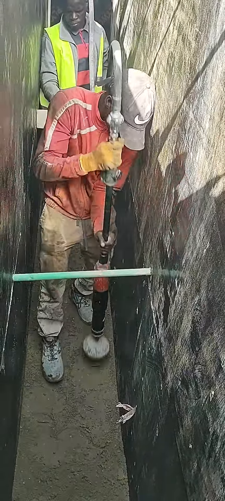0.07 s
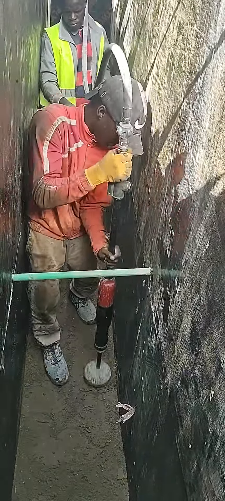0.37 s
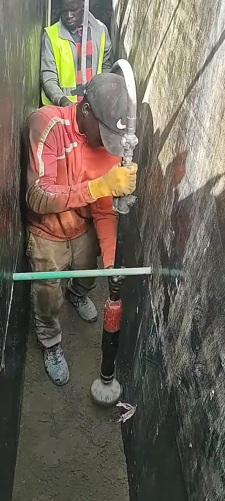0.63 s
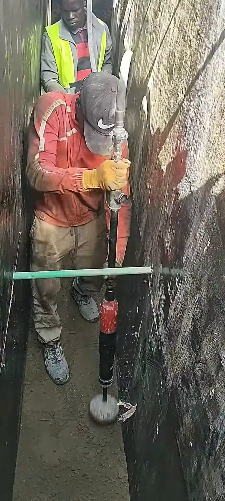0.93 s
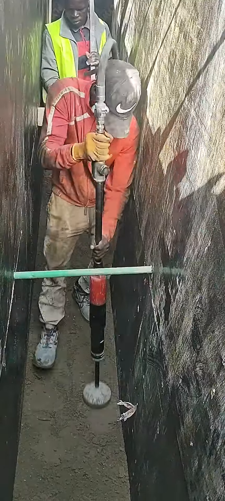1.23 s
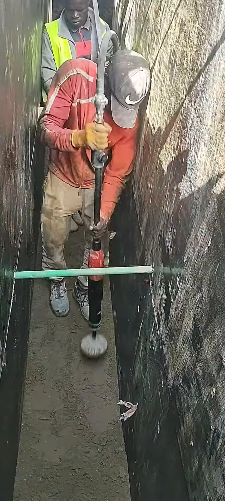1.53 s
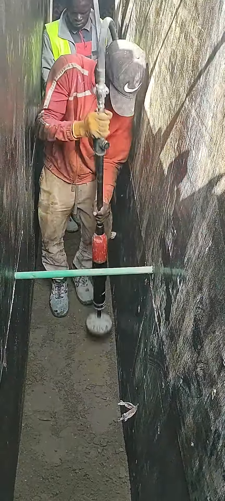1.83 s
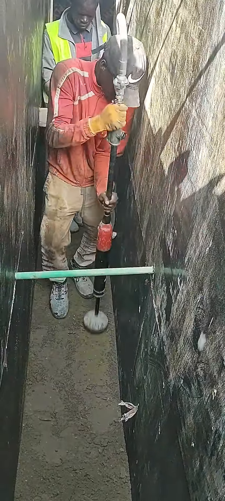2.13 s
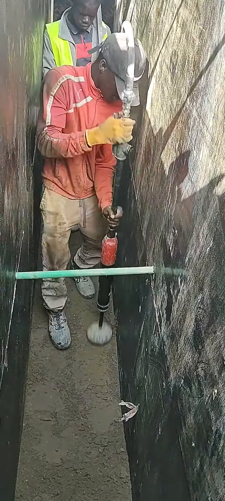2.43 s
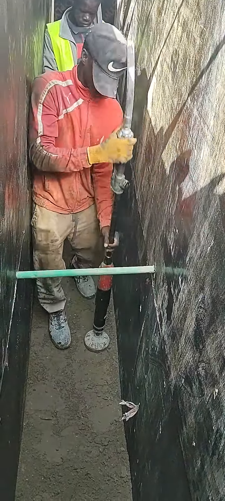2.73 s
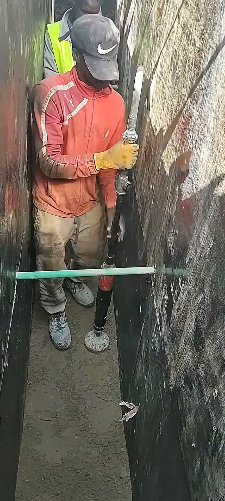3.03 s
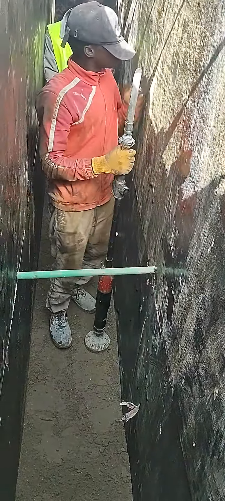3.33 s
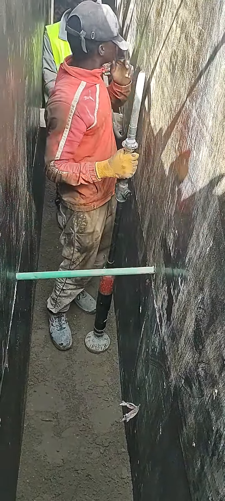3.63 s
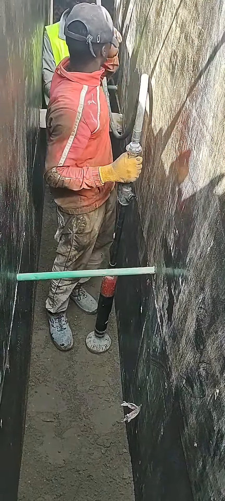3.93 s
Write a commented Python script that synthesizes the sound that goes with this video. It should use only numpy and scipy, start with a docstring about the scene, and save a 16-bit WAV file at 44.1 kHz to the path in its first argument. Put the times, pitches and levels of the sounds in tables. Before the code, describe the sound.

A pneumatic rammer pounds earth close by from the start, about nine even strokes a second, with low thuds and sharp hissing air bursts ringing between tall panels. At about 2.6 seconds it sputters and bounces to rest, with a low boom from the panels fading just after 3 seconds. One tiny puff follows near 3.3 seconds, and a faint, distant compressor hums on until the end.

```python
"""A pneumatic rammer pounds earth between the tall panels of a wall form, close to a stereo microphone.
Nine times a second it vents twice, each time a pressure pulse and a jet of hiss that ring between
the panels, and in between the foot thuds down. The air is shut off, the tool sputters and settles,
and far off across the building site a compressor hums on."""
import sys
import numpy as np
from scipy import signal
from scipy.fft import rfft, irfft
from scipy.io import wavfile
from scipy.ndimage import map_coordinates

SR = 44100
rng = np.random.default_rng(int(sys.argv[2]) if len(sys.argv) > 2 else 0)


def output_pcm(signal):
    """Save a mono or channel-first signal as 16-bit PCM at the path in sys.argv[1].

    Samples are clipped to [-1, 1] before scaling.
    """
    pcm = np.clip(np.atleast_2d(signal).T, -1, 1) * 32767
    wavfile.write(sys.argv[1], SR, np.round(pcm).astype(np.int16))


N = 176400
TIME = np.arange(N) / SR


def from_db(db):
    """Decibels to gain."""
    return 10 ** (np.asarray(db) / 20)


def rms_one(x):
    """Scale to unit rms."""
    return x / np.sqrt(np.mean(x ** 2) + 1e-20)


def at_hz(points, hz):
    """Read a curve on a log-frequency axis."""
    f, value = np.transpose(points)
    return np.interp(np.log(hz + 1), np.log(f), value)


def drift(rate):
    """Smooth random motion of rms 1 that changes about rate times a second."""
    count = int(rate * N / SR) + 4
    return rms_one(signal.resample(rng.standard_normal(8192)[:count], N))


def low_cut(x, hz, order=2):
    """Butterworth high-pass."""
    return signal.sosfilt(signal.butter(order, hz, "high", fs=SR, output="sos"), x + 1e-18)


def resonance(x, hz, width):
    """Band-pass of gain 1 at its peak."""
    return signal.lfilter(*signal.iirpeak(hz, hz / width, fs=SR), x)


def pan(db):
    """Channel gains with the left louder by db."""
    return from_db([[db / 2], [-db / 2]])


def pushes(events, length_s):
    """A smooth bump for each (start, dB); the level sets its area."""
    out = np.zeros(N)
    for s, db in events:
        span = slice(int(s * SR), int((s + length_s) * SR) + 2)
        bump = np.sin(np.pi * np.clip((TIME[span] - s) / length_s, 0, 1)) ** 2
        out[span] += from_db(db) * bump / bump.sum()
    return out


def ring(x, hz, t60):
    """One mode: a unit click starts a wave of height 1 that falls 60 dB in t60 seconds."""
    r, w = 1000 ** (-1 / (t60 * SR)), 2 * np.pi * hz / SR
    return signal.lfilter([1 / 2, 0, -1 / 2], [1, -2 * r * np.cos(w), r * r], x + 1e-18)


def running(end_s, fade_db_per_s):
    """Gain that holds until end_s, then dies away."""
    return from_db(-fade_db_per_s * np.maximum(TIME - end_s, 0))


# How alike the microphone's two sides are. Each row: frequency in Hz, correlation.
STEREO_LIKENESS = [(60, .92), (150, 0.94), (300, 0.74), (600, 0.26), (1200, .25), (2500, .03)]
def noise(spectrum, likeness=STEREO_LIKENESS):
    """Coloured stereo noise of rms 1, by default wider toward the treble."""
    hz = np.arange(N // 2 + 1) * SR / N
    mid, side = rfft(rng.standard_normal((2, N)))
    alike = at_hz(likeness, hz)
    stereo = np.sqrt(1 + alike) * mid + np.sqrt(1 - alike) * side * [[1], [-1]]
    return rms_one(irfft(from_db(at_hz(spectrum, hz)) * stereo, N))


# The site in the distance. Each row: frequency in Hz, relative density in dB.
SITE_SPECTRUM = [(25, -33), (45, -19.5), (70, -5), (95, 1.5), (120, -2.5), (170, -3.5), (250, -19.5),
                 (300, -15), (400, -11), (560, -15), (750, -24), (1150, -29), (1550, -24.5), (2400, -31),
                 (3500, -43.5), (5000, -54.5), (9000, -60.5), (15000, -65.5)]
def site():
    """Steady low noise from far across the site."""
    return from_db(-39.5) * noise(SITE_SPECTRUM)


# The compressor, far from the microphone. Each row: harmonic number, level in dB.
HUM_HARMONICS = [(1, -47.5), (2, -51), (3, -41.5), (4, -47.5), (7, -45), (8, -46), (9, -51), (10, -54),
                 (11, -60), (14, -61)]
def compressor(beat_hz=49.55, waver_db=2):
    """An engine throbs steadily; its higher partials arrive a little later in each beat."""
    angle = 2 * np.pi * np.cumsum(beat_hz * (1 + .004 * drift(8))) / SR
    hum = 0
    for k, db in HUM_HARMONICS:
        height = np.sqrt(2) * from_db(db + waver_db * drift(6.2))
        stereo_phase = np.array([[0], [rng.normal(0, .3)]])
        hum += height * np.cos(k * angle - .2505 * k * k + stereo_phase)
    return hum


# Rumble and boom of the nearby panels. Each row: frequency in Hz, relative density in dB.
RUMBLE_SPECTRUM = [(30, -28), (60, -8.5), (110, 1.5), (200, -4.5), (400, -1.5), (700, -13.5), (1500, -27.5),
                   (3000, -44.5), (8000, -80)]
BOOM_SPECTRUM = [(40, -17.5), (75, -5.5), (100, 1), (155, -1.5), (230, -11), (400, -16), (800, -33.5),
                 (2000, -54), (6000, -90)]
# The swell of the boom. Each row: time in seconds, level in dB.
BOOM_SWELL = [(2.5, -43), (2.67, -24.5), (2.89, -20.5), (2.97, -28.5), (3.12, -38), (3.35, -65)]
def panels():
    """The shaken panels rumble while the tool runs and boom as it comes to rest."""
    rumble = from_db(-24) * noise(RUMBLE_SPECTRUM) * running(end_s=2.74, fade_db_per_s=87)
    boom = from_db(np.interp(TIME, *np.transpose(BOOM_SWELL))) * noise(BOOM_SPECTRUM)
    return rumble + boom


# The rammer's strokes, for foot and exhaust alike. Each row: start in seconds, then relative
# levels in dB of the pulse, the first hiss and the second hiss.
STROKES = [(0.0202, -1.3, 0.4, 0), (0.1316, -0.2, 1.1, 2), (0.2417, 0.8, 0.3, 1.1), (0.3524, 1, 0.5, 1.5),
           (0.46, -0.5, 0.4, -0.2), (0.5722, -1.4, 0.5, 1.6), (0.6818, 0.4, 1.3, 0.7),
           (0.791, -1.3, -0.2, -0.8), (0.9005, -0.8, -0.4, 0.5), (1.0105, 0.5, 0.5, 0.6),
           (1.121, -0.6, 0, 0.3), (1.2317, -0.5, 0.9, 0.1), (1.3434, 0, 0.2, -0.1),
           (1.4542, -1.8, 0.5, 0.2), (1.565, 0, 0.2, 1.9), (1.6762, -1.8, -1, -0.9),
           (1.7881, -1, -0.6, 1.4), (1.8998, 0.5, 0.4, 0.9), (2.0095, 0.4, 0, 1.8), (2.1203, 1, 1.5, 3.1),
           (2.229, 1, 0.3, 1.2), (2.3384, 1.5, -0.5, 1), (2.4478, 1.8, 1, 1.2), (2.5594, -0.3, 0.2, -2.5)]
# The foot bounces to rest. Each row: start in seconds, relative level in dB.
BOUNCES = [(2.653, -1), (2.707, -0.5), (2.765, -3), (2.803, -3), (2.848, -2.5), (2.879, 0), (2.961, -15),
           (3.021, -17)]
# Ground and panels under the foot. Each row: frequency in Hz, level in dB, t60 in seconds.
GROUND_MODES = [(62.3, -35, 0.26), (92.2, -20.5, 0.35), (118.8, -19, 0.35), (145.3, -31.5, 0.095),
                (203, -34, 0.16), (333, -33.5, 0.078)]
def foot(landing_s=.0245):
    """The foot lands softly on the earth once a stroke and sets low modes ringing."""
    landings = [(s + landing_s, 0) for s, *_ in STROKES]
    push = pushes(landings + BOUNCES, length_s=.0028)
    thuds = sum(from_db(db) * ring(push, hz, t60) for hz, db, t60 in GROUND_MODES)
    return low_cut(thuds, hz=50.3)


def puff(start_s, db, attack_s, hold_s, fade_db_per_s):
    """Power envelope of one puff of air."""
    power, span = np.zeros(N), slice(int(start_s * SR), int((start_s + .5) * SR))
    age = TIME[span] - start_s
    fade_db = fade_db_per_s * np.maximum(age - attack_s - hold_s, 0)
    power[span] = (np.clip(age / attack_s, 0, 1) * from_db(db - fade_db)) ** 2
    return power


def jet_noise(spectrum, peaks):
    """Wide hiss with resonances lifted out of it."""
    air = low_cut(noise(spectrum, likeness=[(1000, .043)]), hz=1240)
    return air + sum(from_db(db) * resonance(air, hz, width) for hz, width, db in peaks)


# The last puffs. Each row: start in seconds, pulse level in dB, hiss level in dB,
# hold in seconds, fade in dB per second.
SPUTTERS = [(2.6883, -15, -17.5, 0.0046, 518), (2.764, -2, -21.5, 0.0026, 502),
            (2.876, -26, -41, 0.0044, 650), (2.927, -30, -47.5, 0.015, 400),
            (2.976, -48, -65.5, 0.057, 200), (3.289, -33, -73, 0.0085, 348)]
# Their thin hiss. Each row: frequency in Hz, relative density in dB.
SPUTTER_SPECTRUM = [(880, -32), (1500, 1), (1640, -4.5), (3360, -2.5), (5040, -7.5), (6510, -1.5),
                    (9100, -3), (10200, -4), (15800, -1.5)]
# Whistles of the port. Each row: frequency in Hz, width in Hz, gain in dB.
PORT_WHISTLES = [(6780, 500, -5), (10400, 445, -4)]
def sputter_hiss(attack_s=.003):
    """With the air shut off, weak puffs whistle through the half-closed port."""
    power = sum(puff(s, db, attack_s, hold, fade) for s, _, db, hold, fade in SPUTTERS)
    return rms_one(jet_noise(SPUTTER_SPECTRUM, PORT_WHISTLES)) * np.sqrt(power)


# The full jet, heard close. Each row: frequency in Hz, relative density in dB.
JET_SPECTRUM = [(530, -30), (900, 3.5), (1050, -6.5), (1160, -4.5), (1270, -3), (1450, -5.5), (1580, -5),
                (2010, -5.5), (2520, -8), (3290, -0.5), (4650, 0), (5770, -1), (7160, -7.5), (9660, -6),
                (11300, -7.5), (15100, -6), (15800, -8)]
# Resonances that it excites. Each row: frequency in Hz, width in Hz, gain in dB.
JET_RESONANCES = [(1134, 45, 3), (1471, 39, 2), (1930, 70, -13.5), (5200, 46, -11)]
# Its reflections off the panels beside the tool. Each row: delay in seconds, gain.
JET_REFLECTIONS = [(.0019, 0.54), (.0042, 0.26), (.0071, 0.23)]
def jet(sway_s=.00015):
    """Rushing air, coloured by close reflections that shift as the tool sways."""
    air = jet_noise(JET_SPECTRUM, JET_RESONANCES)
    air -= .4 * resonance(air, hz=2620, width=310)   # a dip in the colour
    for side in air:
        side += sum(gain * map_coordinates(side, [(TIME - lag - sway_s * drift(3)) * SR], order=3)
                    for lag, gain in JET_REFLECTIONS)
    return rms_one(air)


SECOND_VENT_S = .0403   # after the first vent of a stroke
def jet_level(delay_s, second_trim_db=0):
    """Envelope of the two puffs of every stroke, over air that leaks while the tool runs."""
    power = (from_db(-29) * running(end_s=2.6, fade_db_per_s=400)) ** 2
    for s, _, first_db, second_db in STROKES:
        power += puff(s + delay_s, first_db - 13, attack_s=.003, hold_s=.007, fade_db_per_s=360)
        power += puff(s + delay_s + SECOND_VENT_S, second_db - 13.5 + second_trim_db,
                      attack_s=.004, hold_s=.0029, fade_db_per_s=424)
    return np.sqrt(power)


def exhaust_hiss(delay_s=.00019, split_hz=6980, sizzle_lead_s=.0006, flutter_db=.56):
    """Air jets out with each pulse; its high sizzle leads and is a little weaker in the second puff."""
    air = jet()
    body = signal.sosfiltfilt(signal.butter(2, split_hz, fs=SR, output="sos"), air)
    sizzle = (air - body) * jet_level(delay_s - sizzle_lead_s, second_trim_db=-.6)
    hiss = body * jet_level(delay_s) + sizzle + sputter_hiss()
    return hiss * from_db(flutter_db * drift(700)) * pan(db=1)


# The dense ring inside the form. Each row: frequency in Hz, relative density in dB.
TAIL_SPECTRUM = [(30, -34.5), (60, -22), (150, -4.5), (320, 0), (480, -2.5), (560, -6.5), (850, -6.5),
                 (1100, -20.5), (2000, -22), (4000, -45), (9000, -70.5)]
def form_tail(push, build_s=.00386, t60=.33):
    """Reverberation after each pulse, changing as the tool moves along the form."""
    decay = (1 - np.exp(-TIME / build_s)) * 1000 ** (-TIME / t60)
    blend = drift(2)
    tail = 0
    for share in (np.cos(blend), np.sin(blend)):
        response = rms_one((noise(TAIL_SPECTRUM) * decay)[:, :SR // 2])
        tail += share * signal.fftconvolve(push[None], response, axes=1)[:, :N]
    return from_db(-34) * tail


# The air inside the form. Each row: frequency in Hz, level in dB, t60 in seconds, leftward pan in dB.
AIR_MODES = [(124.3, -26, 0.2, .5), (155.5, -28.5, 0.25, 6), (200.8, -34, 0.4, 5), (223, -39, 0.35, -2),
             (273, -29, .3, -7.5), (302, -31, 0.25, -11), (369.8, -29, 0.35, -0.5),
             (395.7, -30.5, 0.45, -2.5), (443.4, -33.5, 0.13, -8), (484, -37.5, 0.22, 0),
             (646, -23, 0.062, -7.5), (828, -22.5, 0.078, -2)]
def form_modes(push, swing_db=2.5):
    """The air between the panels rings; its modes take turns as the tool moves."""
    return sum(from_db(db) * pan(pan_db) * ring(push * from_db(swing_db * drift(3)), hz, t60)
               for hz, db, t60, pan_db in AIR_MODES)


# Paths from port to microphone by way of the panels. Each row: delay in seconds, left gain, right gain.
PANEL_ECHOES = [(.0026, .05, .6), (.0044, .15, 0.31), (.0068, 0.44, 0.69), (.0093, .2, .2),
                (.0135, 0.26, 0.2)]
def exhaust_pulses(pulse_s=.0012):
    """Each opening of the port sends a pressure pulse that bounces and rings between the panels."""
    first = [(s, db) for s, db, *_ in STROKES]
    second = [(s + SECOND_VENT_S, db - .5) for s, db in first]
    last = [(s, db) for s, db, *_ in SPUTTERS]
    push = pushes(first + second + last, pulse_s)
    pressure = push * pulse_s * SR / 2   # unit area becomes unit height
    direct = from_db(-8.5) * low_cut(pressure, hz=180, order=1)
    echoes = sum(np.interp(TIME - lag, TIME, direct) * np.array([[left], [right]])
                 for lag, left, right in PANEL_ECHOES)
    return direct + echoes + form_modes(push) + form_tail(push)


def scene():
    """The rammer close by, its thuds a little to the left; compressor and site far behind."""
    rammer = exhaust_pulses() + exhaust_hiss() + (foot() + panels()) * pan(db=2)
    return rammer + compressor() + site()


def record(dry):
    """The microphone's signal is cut steeply above 15950 Hz and its peaks stop at full scale."""
    top_cut = signal.ellip(12, .1, 70, 15950, fs=SR, output="sos")
    return np.clip(signal.sosfilt(top_cut, dry), -1, 1)


dry = scene()
out = record(dry)
output_pcm(out)
```